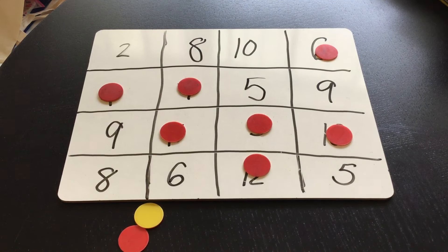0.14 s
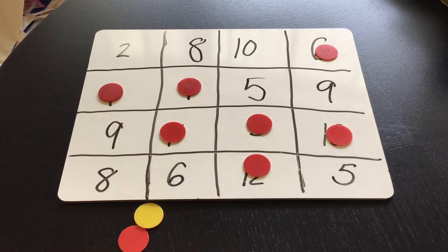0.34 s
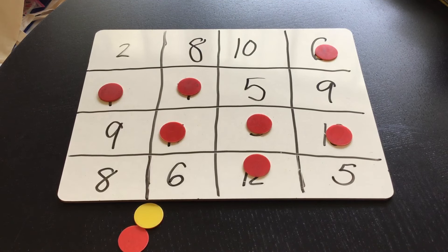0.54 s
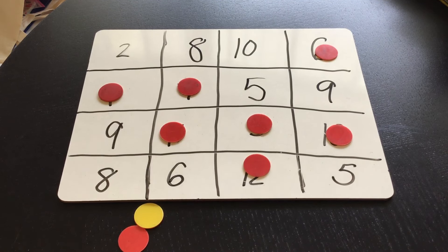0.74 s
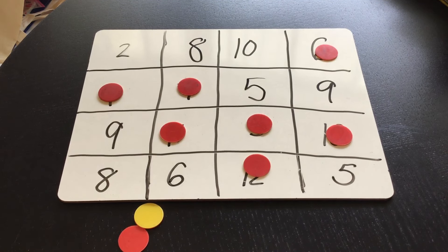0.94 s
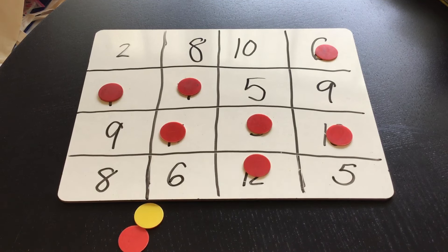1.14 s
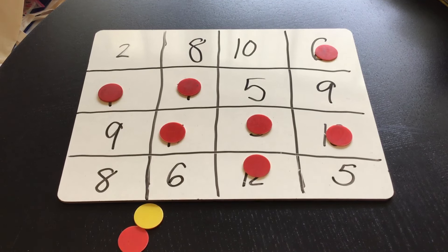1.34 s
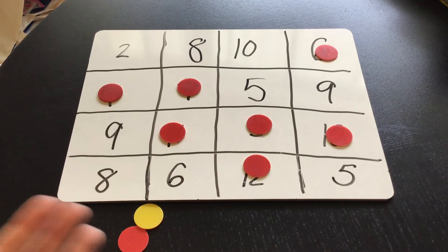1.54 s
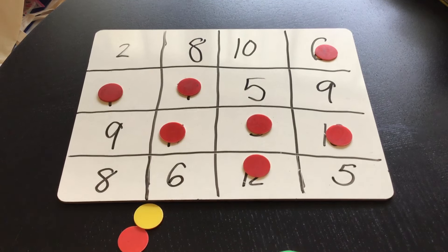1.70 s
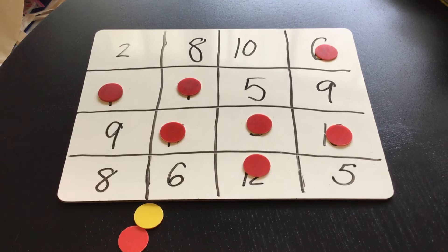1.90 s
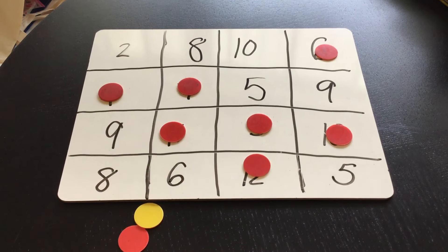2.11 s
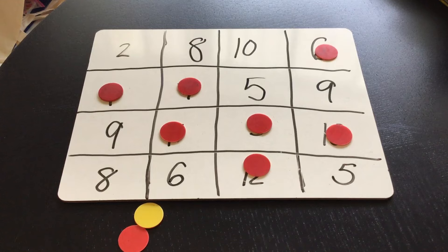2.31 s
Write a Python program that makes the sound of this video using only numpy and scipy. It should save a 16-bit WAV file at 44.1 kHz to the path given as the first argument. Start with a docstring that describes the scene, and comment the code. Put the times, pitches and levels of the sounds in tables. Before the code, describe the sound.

Dice are thrown onto a wooden table in a quiet, fairly live room. Until 1.6 s there is only low room air, a faint wavering appliance hum from about 0.2 s, soft hand rustles and tiny ticks. At 1.64 and 1.69 s come two loud knocks, then rapid brighter clicks, strong near 1.89 s, weakening and rocking to rest by 2.13 s, with a short room tail.

```python
"""A quiet, fairly live room, where two dice are thrown onto a wooden table.
They land with full knocks, tumble in brighter, quicker clicks and rock to rest: each contact is a
filtered click with a ringing table, close echoes and a noise tail for the room.
Before the throw they tick faintly in the hand, as short noise bursts among soft noise rustles.
Dull low puffs are soft bumps; an appliance hums in wavering tones over coloured-noise room air."""
import sys
import numpy as np
from scipy import signal
from scipy.fft import rfft, irfft, next_fast_len
from scipy.io import wavfile
from scipy.ndimage import uniform_filter1d, map_coordinates

SR = 44100
rng = np.random.default_rng(int(sys.argv[2]) if len(sys.argv) > 2 else 0)


def generate_wav(sig):
    """Save sig (samples, or channels by samples) to the path in sys.argv[1] as 16-bit PCM at SR."""
    pcm = np.round(np.clip(np.atleast_2d(sig).T, -1, 1) * 32767).astype(np.int16)
    wavfile.write(sys.argv[1], SR, pcm)


N = 108353  # length in samples


def amp(db):
    """Decibels to gain."""
    return 10 ** (np.asarray(db) / 20)


def unit(x):
    """Scale to rms 1."""
    return x / np.sqrt(np.mean(x ** 2) + 1e-20)


def along(points, hz):
    """Read a curve of (Hz, value) points on a log frequency axis."""
    f, v = np.transpose(points)
    return np.interp(np.log(hz + 1), np.log(f + 1), v)


def wobble(rate):
    """A smooth random curve, rate knots a second."""
    return map_coordinates(rng.standard_normal(1024), [np.arange(N) * rate / SR], mode="wrap")


def noise(colour_db, size):
    """Noise of rms 1, coloured by a function from Hz to dB."""
    spectrum = rfft(rng.standard_normal(size))
    hz = np.fft.rfftfreq(size, 1 / SR)
    return unit(irfft(spectrum * amp(colour_db(hz)), size))


def causal(db):
    """Minimum-phase response of a gain curve: the energy comes as early as it can."""
    cepstrum = irfft(np.log(amp(db)))
    half = len(cepstrum) // 2
    cepstrum[1:half] *= 2
    cepstrum[half + 1:] = 0
    return np.exp(rfft(cepstrum))


def add(track, s, sound):
    """Mix a sound in at time s."""
    part = track[max(round(s * SR), 0):][:len(sound)]
    part += sound[:len(part)]


def tail(t60, rise_s, colour, size, order):
    """Diffuse ringing of energy 1, each frequency dying at its own speed after a soft rise."""
    source = noise(lambda f: along(colour, f), size)
    hz, t, z = signal.stft(source, SR, nperseg=order)
    decay = amp(-60 * t / along(t60, hz)[:, None])
    ringing = signal.istft(z * decay, SR, nperseg=order)[1][:size]
    ringing = ringing * (1 - np.exp(-(np.arange(size) / SR / rise_s) ** 2))
    return ringing / np.linalg.norm(ringing)


def grainy(x, depth_db):
    """Break a sound into tiny time-frequency patches, each with its own strength."""
    z = signal.stft(x, nperseg=256)[2]
    field = rng.standard_normal(z.shape)
    field = uniform_filter1d(field, size=4, axis=0)
    field = uniform_filter1d(field, size=2, axis=1)
    return unit(signal.istft(z * amp(depth_db * unit(field)), nperseg=256)[1][:len(x)])


# Dice striking the table. Each row: start in seconds, level in dB before DICE_DB,
# knock weight in dB before KNOCK_DB, click weight in dB, bright edge weight in dB before EDGE_DB.
DICE_HITS = [(1.639, -3, -17, -8, -14), (1.686, -5, -21.5, -8, -19.5), (1.7506, -18, -11.5, 1, -13),
             (1.7842, -20.5, -11.5, -3, -14.5), (1.8223, -12.5, -21.5, 1.5, -26),
             (1.8288, -11.5, -22, 2.5, -20.5), (1.8485, -17.5, -21, -4, -16), (1.881, -14.5, -23.5, 5, -19),
             (1.889, -6.5, -28, 5.5, -7), (1.9132, -21.5, -21.5, 6.5, -15.5),
             (1.9279, -16, -21.5, 3, -20.5), (1.9359, -10, -29.5, 3.5, -12.5),
             (1.9466, -23.5, -18, 5.5, -26), (1.969, -11, -30.5, -1.5, -15), (1.9723, -12.5, -29, 1.5, -8),
             (1.9873, -21, -20.5, 6, -18), (1.992, -20, -25.5, -0.5, -26), (2.0231, -24.5, -27, 4.5, -23.5),
             (2.0275, -22, -25, -0.5, -26), (2.0534, -28.5, -19.5, -1, -29), (2.0761, -32, -20, -4, -26),
             (2.094, -30, -21.5, -6, -26), (2.1139, -35.5, -18, -3, -18), (2.1235, -29.5, -21, 2, -16.5)]
# Basic colour of one contact. Each row: frequency in Hz, gain in dB.
CONTACT_COLOUR = [(30, -37.5), (70, -5.5), (130, 2.5), (350, 2.5), (610, 7.5), (800, 2.5), (1200, 6.5),
                  (1850, 3.5), (2200, 2.5), (2850, 5.5), (3080, 4.5), (3350, 5), (4100, 4.5), (4900, 2.5),
                  (5400, 1), (5900, -12), (7000, -21.5), (8200, -46), (10500, -52), (12500, -35),
                  (15500, -46)]
# Close echoes of each click. Each row: delay in ms, signed linear gain.
CLOSE_ECHOES = [(1.58, -2), (3.35, 0.24)]
DICE_DB, KNOCK_DB, EDGE_DB = 5.5, 11.5, 7.5  # trims on the columns of DICE_HITS
KNOCK_HZ, MIDDLE_HZ, CLICK_HZ, EDGE_HZ, GLINT_HZ = 1540, 3020, 3980, 5500, 7900
GLINT_DB, GLINT_FOLLOWS = 3, 0.22  # the very top follows the force of the knock, in dB per dB
BASS_LAG_S, BASS_LAG_HZ = 0.002, 375.6  # low bending waves cross the table more slowly
SHUDDER_ECHO, ROOM_ECHO = 0.077, 0.017  # share of the close echoes in the shudder and in the room
ROOM_SHARED = 0.3  # share of room energy that is alike for every contact


def dice(size=32768):
    """Each contact is a sharp click that shakes and rings the table, echoes nearby and fills the room."""
    out = np.zeros(N)
    hz = np.fft.rfftfreq(size, 1 / SR)
    t = np.arange(size // 4) / SR
    echoes = sum(gain * np.exp(-2j * np.pi * hz * ms / 1000) for ms, gain in CLOSE_ECHOES)
    # a phase turn that delays the lows most
    bending = np.exp(-2j * np.pi * BASS_LAG_S * BASS_LAG_HZ * np.arctan(hz / BASS_LAG_HZ))
    shared_room = room_tail(size)
    for s, db, knock_db, click_db, edge_db in DICE_HITS:
        glint_db = GLINT_DB + GLINT_FOLLOWS * (db + knock_db)
        weight = [(KNOCK_HZ, knock_db + KNOCK_DB), (MIDDLE_HZ, 0), (CLICK_HZ, click_db),
                  (EDGE_HZ, edge_db + EDGE_DB), (GLINT_HZ, glint_db)]
        click = causal(along(CONTACT_COLOUR, hz) + along(weight, hz))
        contact = click * (1 + rfft(table_ring(t), size))
        shudder = table_shudder(len(t), size)
        room = np.sqrt(ROOM_SHARED) * shared_room + np.sqrt(1 - ROOM_SHARED) * room_tail(size)
        direct = 1 + echoes
        paths = direct + shudder * (1 + SHUDDER_ECHO * echoes) + room * (1 + ROOM_ECHO * echoes)
        sound = irfft(contact * bending * paths)[:-len(t)]
        add(out, s, amp(db + DICE_DB) * sound)
    return out


# Brief ring of the table and dice. Each row: frequency in Hz before detuning,
# level in dB against the click before the random spread.
RING_MODES = [(370, -40.5), (575, -43), (805, -35), (1075, -40.5), (1335, -32), (1490, -44.5),
              (1800, -40.5), (2150, -33.5), (2800, -42.5), (3300, -36.5), (3750, -35), (4140, -46),
              (4720, -46)]
RING_T60 = 0.022  # seconds
RING_SPREAD_DB, RING_DETUNE = 2.5, 0.015  # random spread of level in dB, of pitch as a fraction


def table_ring(t):
    """Damped modes of table and dice, struck a little differently at each contact."""
    ring = np.zeros(len(t))
    for hz, db in RING_MODES:
        level_db = db + rng.normal(0, RING_SPREAD_DB)
        pitch = hz * (1 + rng.normal(0, RING_DETUNE))
        ring += amp(level_db - 60 * t / RING_T60) * np.cos(2 * np.pi * pitch * t)
    return ring


# Decay of the table's shudder. Each row: frequency in Hz, time to fall 60 dB in seconds.
SHUDDER_T60 = [(300, 0.035), (1500, 0.022), (3000, 0.013), (6000, 0.017)]
SHUDDER_DB, SHUDDER_RISE_S = 2, 0.0021


def table_shudder(length, size):
    """Spectrum of the dense, short vibration scattered through the table."""
    flat = [(1, 0)]
    return amp(SHUDDER_DB) * rfft(tail(SHUDDER_T60, SHUDDER_RISE_S, flat, length, order=64), size)


# Decay of the room. Each row: frequency in Hz, time to fall 60 dB in seconds.
ROOM_DECAY = [(150, 0.42), (1000, 0.46), (3000, 0.32), (5000, .43), (8000, 0.11), (15000, 0.32)]
# Colour of the room. Each row: frequency in Hz, gain in dB.
ROOM_TONE = [(150, 1), (800, -3.5), (2200, 1), (4000, -8), (6000, -0.5), (13000, -1)]
ROOM_DB, ROOM_RISE_S = -1.5, 0.011


def room_tail(size):
    """Spectrum of the diffuse reverberation, which builds up softly and dies by frequency."""
    return amp(ROOM_DB) * rfft(tail(ROOM_DECAY, ROOM_RISE_S, ROOM_TONE, size, order=256))


# Soft, dull bumps against the table. Each row: time of the peak in seconds, level in dB, centre in Hz.
SOFT_BUMPS = [(.565, -58, 165), (1.812, -45, 327)]
BUMP_LENGTH_S, BUMP_OCTAVES = 0.0082, 0.21


def bumps():
    """Soft contacts give a short, low puff of narrow-band noise with no click."""
    out, t = np.zeros(N), np.arange(N) / SR
    for s, db, hz in SOFT_BUMPS:
        dull = noise(lambda f: -6 * (np.log2((f + 1) / hz) / BUMP_OCTAVES) ** 2, N)
        out += amp(db) * np.exp(-((t - s) / BUMP_LENGTH_S) ** 2) * dull
    return out


# Faint ticks of handling. Each row: start in seconds, level in dB before TICK_DB,
# centre in Hz, width in octaves.
HAND_TICKS = [(.56, -51, 2100, .35), (0.577, -54, 4640, 0.27), (0.626, -48.5, 2100, 1),
              (0.64, -59, 2580, 0.96), (.857, -52.5, 3620, 0.41), (.984, -59, 4000, .6),
              (1.032, -67, 2200, 0.77), (1.112, -50.5, 4900, 0.32), (1.206, -51.5, 1400, 0.24),
              (1.221, -56, 5000, 0.1), (1.318, -59.5, 5600, .15), (1.458, -56.5, 5400, .12),
              (1.521, -52, 5530, 0.19), (1.59, -47.5, 4150, 0.14)]
TICK_DB, TICK_T60 = -10.5, 0.02  # trim in dB, decay in seconds
TICK_SKIRT_DB = -20.5  # broad low skirt under each tick's band


def ticks(size=8192):
    """Small contacts of the handled dice: bursts of banded noise that die fast."""
    out, t = np.zeros(N), np.arange(size) / SR
    for s, db, centre_hz, octaves in HAND_TICKS:
        def band(f):
            """A peak at the centre over a skirt that falls in the highs."""
            skirt = amp(TICK_SKIRT_DB) / (1 + (f / centre_hz / 2) ** 2)
            peak = np.exp(-0.5 * (np.log2((f + 1) / centre_hz) / octaves) ** 2)
            return 20 * np.log10(skirt + peak)
        add(out, s, amp(db + TICK_DB - 60 * t / TICK_T60) * noise(band, size))
    return out


# Soft rustles of the hand. Each row: time of the peak in seconds, length in seconds,
# level in dB before the flutter.
HAND_RUSTLES = [(0.063, 0.012, -72.5), (0.266, 0.047, -68.5), (0.402, 0.06, -69), (0.632, 0.032, -70),
                (0.8, 0.023, -67), (0.86, 0.068, -69), (1.029, 0.048, -70), (1.293, 0.089, -73.5),
                (2.273, 0.048, -71)]
# Colour of the rustles. Each row: frequency in Hz, relative level in dB.
RUSTLE_TONE = [(500, 5.5), (2500, -9), (4200, 2), (5400, 4.5), (6600, -10.5), (10000, -18.5), (15000, -9)]
RUSTLE_GRAIN_DB, FLUTTER_DB, FLUTTERS_PER_S = 5, 3, 110


def rustles():
    """The hand's friction is grainy noise in soft swells with a fast flutter."""
    t = np.arange(N) / SR
    swell = sum(amp(db) * np.exp(-2 * ((t - s) / length) ** 2) for s, length, db in HAND_RUSTLES)
    flutter = unit(amp(FLUTTER_DB * wobble(FLUTTERS_PER_S)))
    friction = grainy(noise(lambda f: along(RUSTLE_TONE, f), N), RUSTLE_GRAIN_DB)
    return swell * flutter * friction


# Tones of the appliance. Each row: frequency in Hz, rms level in dB before the swell.
HUM_TONES = [(120, -74), (192, -64), (277, -81.5)]
# The hum swells early on. Each row: time in seconds, gain in dB.
EARLY_SWELL = [(.18, -12.5), (.24, 0)]
HUM_WAVER, HUM_WAVERS_PER_S = 0.2, 8  # depth as a fraction, random knots per second


def hum():
    """An appliance hums in a few tones, each wavering in strength and phase."""
    t = np.arange(N) / SR
    tones = np.zeros(N)
    for hz, db in HUM_TONES:
        drift = wobble(HUM_WAVERS_PER_S) + 1j * wobble(HUM_WAVERS_PER_S)
        tone = np.real((1 + HUM_WAVER * drift) * np.exp(2j * np.pi * hz * t))
        tones += amp(db) * unit(tone)
    return amp(np.interp(t, *np.transpose(EARLY_SWELL))) * tones


# Colour of the room air. Each row: frequency in Hz, relative level in dB.
AIR_COLOUR = [(20, -62), (40, -20), (70, -3.5), (140, -6), (200, -1.5), (300, -6.5), (500, -18.5),
              (1200, -25.5), (2700, -34.5), (4500, -28), (7400, -43.5), (15800, -49)]
AIR_DB, AIR_SWAY_DB, AIR_SWAYS_PER_S = -64.5, 0.3, 7.8


def air():
    """Room air is low-heavy noise that sways slightly in level."""
    sway = amp(AIR_DB + AIR_SWAY_DB * wobble(AIR_SWAYS_PER_S))
    return sway * noise(lambda f: along(AIR_COLOUR, f), N)


def scene():
    """The throw over the quiet room, on one channel."""
    return (dice() + bumps() + ticks() + rustles() + hum() + air())[None]


TOP_HZ = 15900


def record(dry):
    """The recorder keeps nothing above its band limit."""
    size = next_fast_len(N + SR // 2)
    passed = np.fft.rfftfreq(size, 1 / SR) < TOP_HZ
    return irfft(rfft(dry, size) * passed, size)[..., :N]


dry = scene()
out = record(dry)
generate_wav(out)
```